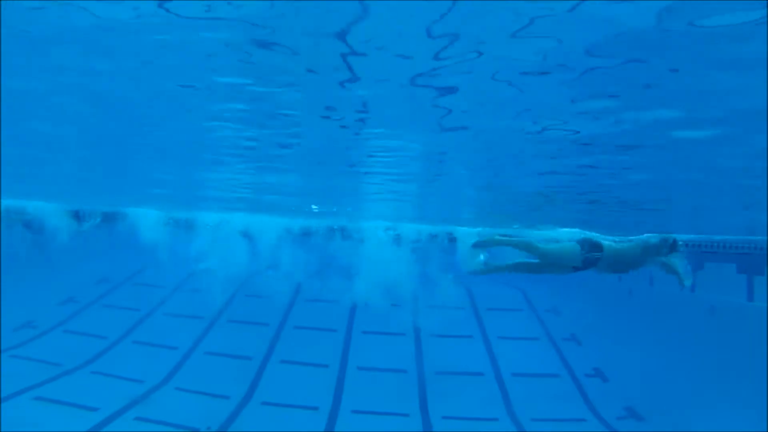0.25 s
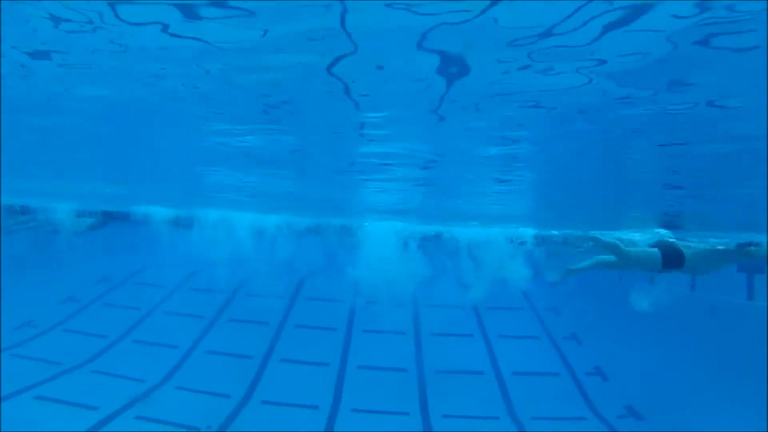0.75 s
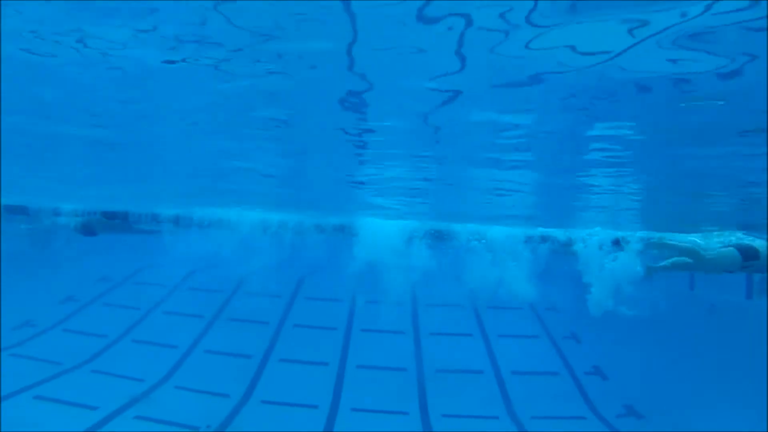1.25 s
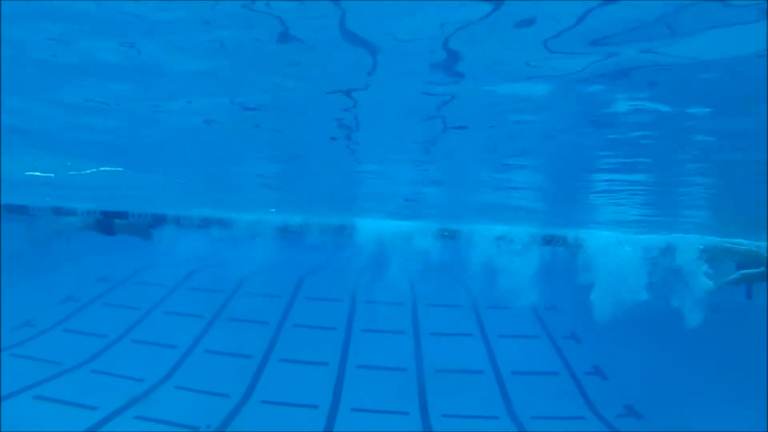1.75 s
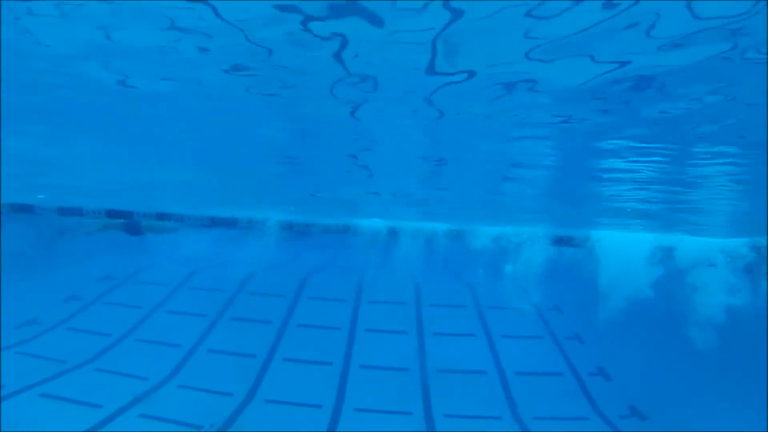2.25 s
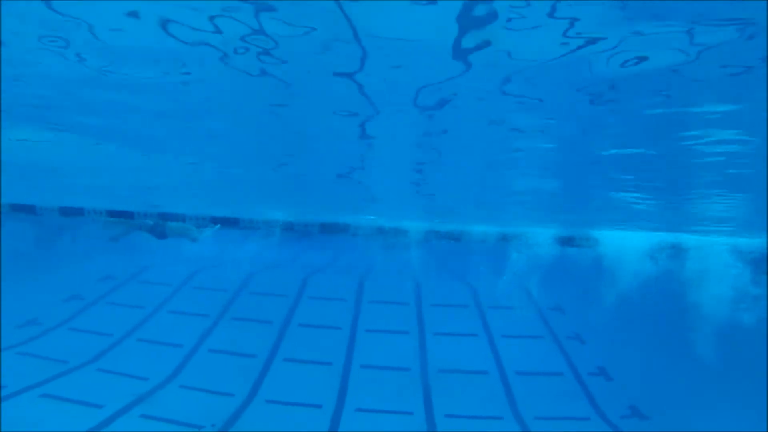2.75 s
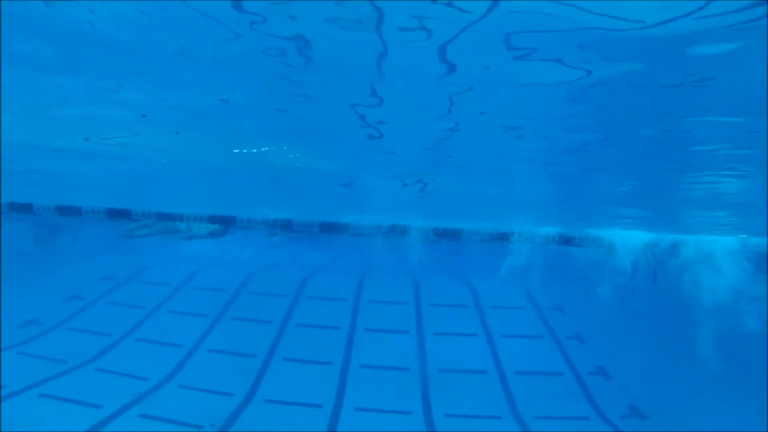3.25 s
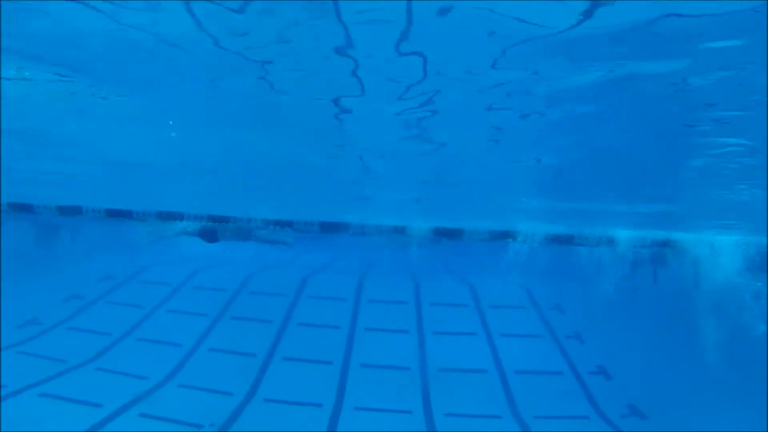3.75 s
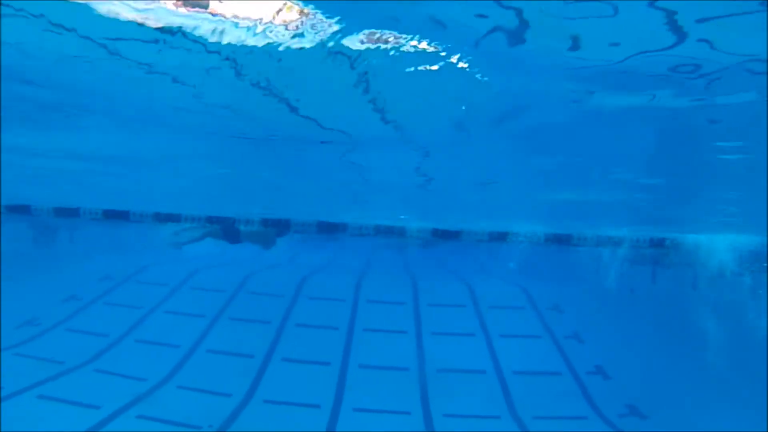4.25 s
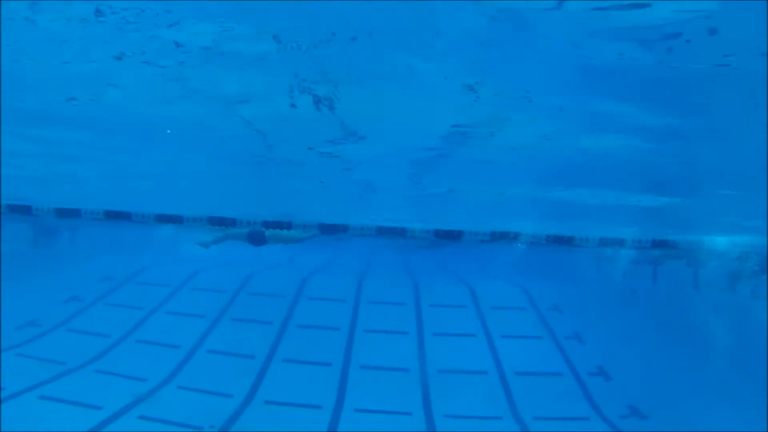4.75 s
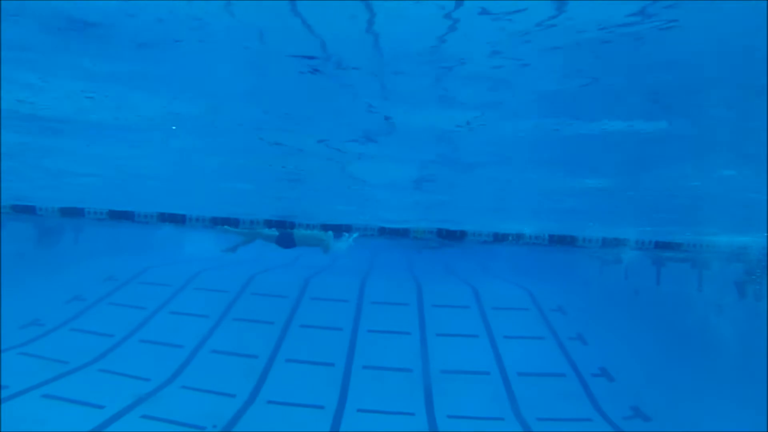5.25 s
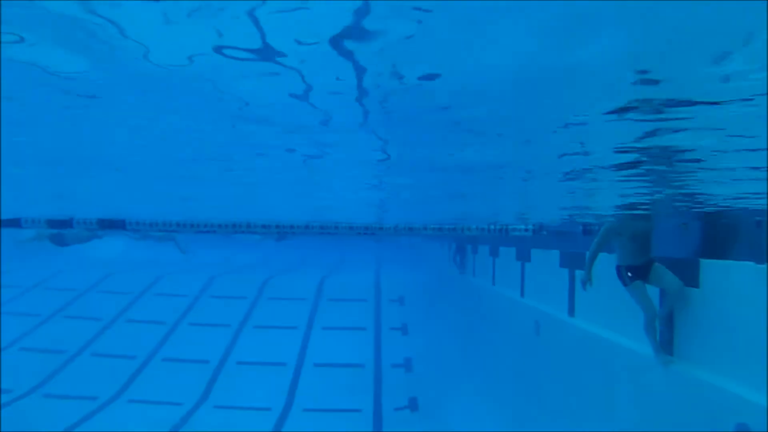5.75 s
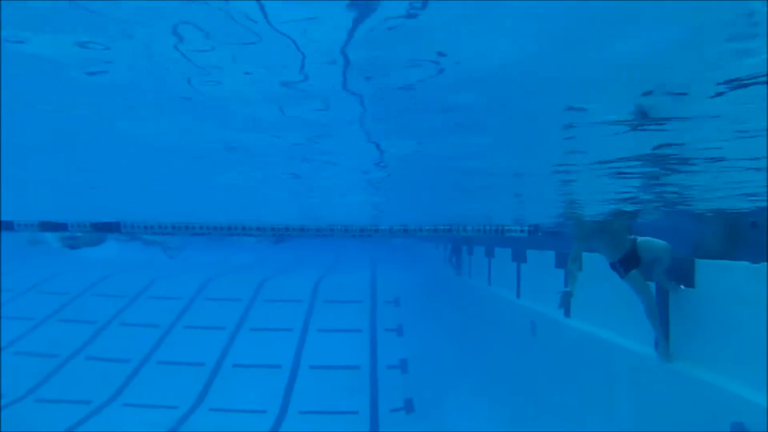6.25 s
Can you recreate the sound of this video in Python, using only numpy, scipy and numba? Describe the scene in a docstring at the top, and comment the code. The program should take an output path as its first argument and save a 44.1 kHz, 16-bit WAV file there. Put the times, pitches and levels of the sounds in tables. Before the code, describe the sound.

From the start, a low, muffled wash of churning water and bubbles is heard through a sealed microphone under the surface of a swimming pool. A swimmer's kicks swell it in uneven pulses, about four a second, over a hollow, resonant hum and gurgling foam. Single bubbles ring out throughout, some as deep plops, others as short, higher blips. Brighter clusters come at about 2 and 3 seconds, and the strongest low plops fall between 3.3 and 3.8 seconds. The bubbling carries on until about 5.6 seconds, when a tick marks an abrupt cut to calmer water by the pool wall. There the wash is quieter, with a low hum rising and falling, a few faint blips and a soft, deep plop just before the end at about 6.5 seconds. A faint microphone hiss lies under both places.

```python
"""A low churning wash dotted with plops, heard from a sealed microphone under water beside a pool's lanes.
A swimmer's kicks drive down clouds of large bubbles and his strokes leave foam; each bubble rings as a
fading sine, and pool and housing ring with them. Then a hard cut, with a tick, jumps to a calmer spot
by the wall. The microphone's own hiss lies under both places."""
import sys
import numpy as np
from scipy import signal
from scipy.fft import rfft, irfft, next_fast_len
from scipy.io import wavfile
from scipy.ndimage import uniform_filter1d
from numba import njit

SR = 44100
rng = np.random.default_rng(int(sys.argv[2]) if len(sys.argv) > 2 else 0)


def persist_wave(psi):
    """Save psi, clipped to +-1, as 16-bit WAV."""
    counts = np.round(np.clip(psi, -1, 1) * 32767).astype(np.int16)
    wavfile.write(sys.argv[1], SR, np.atleast_2d(counts).T)


N = 287091


def undb(db):
    """Gain of a level in dB."""
    return 10 ** (np.asarray(db) / 20)


def unit(x):
    """Scaled to rms 1."""
    return x / np.sqrt(np.mean(x ** 2))


def level_curves(table):
    """The columns of a timed level table, sample by sample."""
    times, *columns = np.transpose(table)
    return np.array([np.interp(np.arange(N) / SR, times, column) for column in columns])


@njit
def ring_bubbles(start, hz, cycles, size, glide, rise):
    """Each bubble's sine swells over `rise` periods; per `cycles` periods it fades to 1/e and glides up."""
    y = np.zeros(N)
    for k in range(len(start)):
        decay_samples = cycles[k] * SR / hz[k]
        phasor = size[k] + 0j
        step = np.exp(2j * np.pi * hz[k] / SR - 1 / decay_samples)
        bend = np.exp(2j * np.pi * glide * hz[k] / SR / decay_samples)
        closed, opening = 1., np.exp(-hz[k] / SR / rise)
        for i in range(int(start[k]), min(N, int(start[k] + 9 * decay_samples))):
            y[i] += phasor.imag * (1 - closed) ** 2
            closed *= opening
            phasor *= step
            step *= bend
    return y


def bubble_cloud(lo_hz, hi_hz, cycles, scatter_db, wash_db, count):
    """A swarm of bubbles of all sizes, a few far louder than the rest, over the blur of distant ones."""
    when, pitch, length, luck = rng.random((count, 4)).T
    hz = lo_hz * (hi_hz / lo_hz) ** pitch
    size = hz * undb(-scatter_db * np.log(1 - luck))  # rising with pitch keeps the spectrum flat
    swarm = ring_bubbles(when * N, hz, cycles * (.5 + length), size, glide=0.034, rise=0.28)
    distant = rng.standard_normal(N) * np.sqrt(SR / 2 / (hi_hz - lo_hz))
    return unit(swarm) + undb(wash_db) * distant


def through_water(x, slope, modes, lo_hz, hi_hz):
    """One soft-edged band of x, coloured by water and housing, at rms 1."""
    fft_n = next_fast_len(N, True)
    hz = np.fft.rfftfreq(fft_n, 1 / SR) + 1
    slope_hz, slope_db = np.transpose(slope)
    colour_db = np.interp(np.log(hz), np.log(slope_hz), slope_db)
    colour_db += sum(db / (1 + (2 * (hz - centre) / width) ** 2) for centre, width, db in modes)
    band = 1 / np.sqrt((1 + (lo_hz / hz) ** 16) * (1 + (hz / hi_hz) ** 16))
    return unit(irfft(rfft(x, fft_n) * undb(colour_db) * band, fft_n)[:N])


def microphone_at(clouds, levels, slope, modes, rumble_db, fizz_db, hiss_db):
    """The wash at one microphone position: seven bands, from rumble through the bubbles up to hiss."""
    # borders of the layers below, lowest first (frequency [Hz])
    edges_hz = [15, 90, 200, 460, 1400, 2200, 4500, 20000]
    churn, foam, fizz = clouds
    hum_db, churn_db, foam_db = levels
    noise = rng.standard_normal(N)
    flicker_db = 1.1 * unit(uniform_filter1d(rng.standard_normal(N), 1300))  # the treble flickers
    # low and high foam gurgle in patches, each at its own moments
    patches = [uniform_filter1d(rng.standard_normal(N), 1500) for _ in range(2)]
    gurgle_db = [0.72 * unit(uniform_filter1d(patch, 1500)) for patch in patches]
    swell_db = 0.93 * (foam_db - np.mean(foam_db))  # the finest bubbles come with the foam
    layers = [(noise, rumble_db),
              (churn, hum_db), (churn, churn_db),
              (foam, foam_db + gurgle_db[0]), (foam, foam_db + gurgle_db[1]),
              (fizz, fizz_db + swell_db + flicker_db),
              (noise, hiss_db + flicker_db)]
    return sum(undb(db) * through_water(source, slope, modes, lo_hz, hi_hz)
               for (source, db), lo_hz, hi_hz in zip(layers, edges_hz, edges_hz[1:]))


def beside_lanes(clouds):
    """Microphone beside the lanes: a steady wash of bubbles, stirred by the swimmer."""
    # the wash between kicks (time [s], hum [dB], churn [dB], foam [dB])
    wash = [(0, -42, -42, -51), (1.75, -43.5, -42.5, -52), (2.4, -40.5, -40.5, -49.5),
            (3.0, -42.5, -40.5, -51.5), (4.0, -40, -39.5, -49.5), (5.6, -41, -42, -48.5)]
    # broad response of water and housing here (frequency [Hz], relative gain [dB])
    slope = [(20, -28.5), (45, -25), (85, -17), (160, -10), (400, -4.5), (470, -20.5), (800, -10),
             (1300, -22.5), (1800, -38.5), (2200, -50.5), (4000, -64), (7000, -72.5), (11500, -83.5),
             (16000, -90)]
    # their resonances and dips (frequency [Hz], width [Hz], gain [dB])
    modes = [(122.6, 46, 14), (145, 1, -1.5), (160.2, 26, 15), (230.6, 11, 7), (265.3, 12, 6.5),
             (372.7, 22, 2.5), (520, 79, 13.5), (568, 8.5, 4), (627.3, 118, 13.5), (775, 40, -11),
             (845, 13, 5.5), (925, 38.5, -8.5), (983.4, 28, 8), (1095, 120, 6), (1425, 190, -10.5),
             (1700, 110, 3), (2070, 12, 6.5), (2720, 150, -5.5), (2927, 53, 11), (3170, 240, 6.5),
             (3370, 150, -4.5), (3710, 210, 3), (5160, 520, 6.5)]
    levels = add_kicks(level_curves(wash))
    return microphone_at(clouds, levels, slope, modes, rumble_db=-51.5, fizz_db=-66, hiss_db=-85)


def plops():
    """Single bubbles that ring out clear of the wash, in both places."""
    # one bubble a row (time [s], size [dB], pitch [Hz], fade to 1/e [periods])
    bubbles = [(.070, -37, 621, 13), (.130, -44, 1595, 18), (0.159, -23.5, 159.7, 4.5),
               (0.186, -22, 156.3, 4.3), (.298, -21, 160, 3.6), (0.36, -32.5, 1280, 8.6),
               (0.363, -39, 1620, 7.7), (.372, -35.5, 1056, 11), (.467, -39, 1110, 5),
               (.205, -25.5, 156, 3.2), (.618, -34.5, 1045, 10), (0.697, -28, 144, 2.6),
               (.651, -36.5, 1210, 8.3), (0.686, -42, 1160, 8), (0.717, -41, 1700, 8.2),
               (0.627, -26.5, 339, 3.1), (0.675, -32, 326, 3.4), (0.741, -39, 1714, 18),
               (.889, -37, 1020, 9), (.900, -22, 153, 7.1), (.997, -37.5, 1056, 19), (1.068, -49, 2050, 22),
               (1.118, -29, 291, 3), (.255, -26.5, 280, 3.9), (.599, -39, 1280, 8), (.773, -41, 1750, 10),
               (.814, -38, 1720, 10), (1.151, -16.5, 158, 3), (1.165, -40, 1090, 8.9),
               (1.246, -22, 148, 2.2), (1.277, -38, 1503, 11), (1.336, -24.5, 161, 6.1),
               (1.417, -68, 7400, 12), (1.417, -68, 5500, 9.7), (1.417, -54, 3050, 5.4),
               (1.428, -54, 2950, 8.6), (1.420, -29.5, 372, 4.9), (1.4583, -32, 1770, 6.5),
               (1.489, -39.5, 1610, 10), (1.524, -31, 340, 4.7), (1.550, -40, 1640, 17),
               (1.636, -43, 1800, 14), (1.737, -26.5, 165, 4.8), (1.829, -39, 1080, 12),
               (1.865, -38, 1130, 18), (1.892, -37.5, 1180, 14), (1.914, -36.5, 1220, 10),
               (1.956, -40, 1170, 8), (2.049, -36.5, 1710, 7), (2.128, -29.5, 363, 4),
               (2.395, -39, 1166, 13), (2.752, -28.5, 224, 2.9), (2.943, -27, 256, 2.7),
               (1.928, -26.5, 151, 3.7), (1.992, -25.5, 1363, 9.2), (2.160, -35, 1264, 18),
               (2.185, -20, 407.4, 6.9), (2.243, -21.5, 153.5, 3.4), (2.001, -22, 157, 3.2),
               (2.193, -27, 151, 4.8), (2.325, -27, 151, 4.1), (2.396, -25.5, 164, 3.5),
               (2.429, -22.5, 154, 2.2), (2.612, -29, 220, 3.5), (2.648, -28, 153.4, 6),
               (2.491, -29, 163, 2.5), (2.915, -56, 3650, 9.7), (2.908, -40, 1620, 10),
               (2.921, -36.5, 1595, 14), (2.942, -41, 1583, 25), (2.952, -21, 1050, 5),
               (2.964, -31, 990, 9.6), (2.954, -36, 1234, 6.3), (2.960, -51.5, 3500, 10),
               (2.998, -32, 1280, 6.5), (3.004, -30, 1050, 5.3), (3.018, -33, 1100, 5),
               (3.084, -37, 1125, 14), (3.082, -39.5, 1520, 6), (3.037, -44, 1750, 8.3),
               (3.044, -36.5, 990, 19), (3.063, -36, 1146, 11), (3.104, -23.5, 171, 2.4),
               (3.217, -35, 1160, 14), (3.238, -38, 1420, 8.6), (3.256, -22, 155.4, 3),
               (3.273, -21.5, 151.3, 3.2), (3.459, -37, 1080, 4.9), (3.347, -24, 199, 1.6),
               (3.364, -20, 262, 1.3), (3.371, -18, 250, 0.92), (3.322, -18, 166, 2), (3.351, -36, 1150, 4),
               (3.352, -36, 2120, 7.9), (3.352, -31.5, 1680, 7.8), (3.357, -43, 2250, 10),
               (3.352, -37, 2370, 4.5), (3.352, -49, 2870, 4.6), (3.379, -35.5, 1660, 14),
               (3.409, -39, 1700, 15), (3.521, -30.5, 598, 4.9), (3.659, -47, 2090, 29),
               (3.665, -15, 239, 3.9), (3.674, -18.5, 165, 5.4), (3.715, -20, 164.2, 6),
               (3.838, -24.5, 230, 2.6), (3.741, -26, 347, 4.2), (3.687, -15, 237, 2.8),
               (3.690, -50, 4140, 2.4), (3.690, -59, 7040, 2.3), (3.705, -52.5, 3000, 9.9),
               (3.757, -15, 202, 2.2), (3.791, -21.5, 210, 2.7), (3.871, -24.5, 162, 10.4),
               (3.908, -35, 154, 5), (4.240, -32, 394, 6.6), (4.292, -26.5, 164.6, 5.2),
               (4.358, -27, 379, 4), (4.407, -36, 972, 8), (4.587, -37, 980, 8), (4.665, -36, 1024, 13),
               (4.982, -34.5, 1010, 8), (4.326, -44, 1250, 8.9), (4.440, -36.5, 1580, 9.9),
               (4.445, -32, 1253, 15), (4.494, -36, 1237, 8.2), (4.635, -37.5, 1136, 16),
               (4.681, -35, 360, 2.1), (4.828, -41, 1755, 12), (4.838, -31, 1060, 9),
               (4.926, -39, 1130, 15), (5.026, -42.5, 1776, 17), (5.042, -29.5, 149, 4.3),
               (5.072, -36, 986, 12), (5.177, -35.5, 1014, 7.1), (5.197, -33, 985, 8.8),
               (5.295, -37, 980, 8), (5.384, -36, 1134, 9.6), (5.336, -47, 3140, 9),
               (5.33, -48.5, 2945, 18), (5.339, -49, 2950, 23), (5.404, -55, 2950, 14),
               (5.352, -30.5, 392, 18), (5.453, -30.5, 1065, 6.5), (5.470, -36.5, 1026, 10),
               (5.298, -42, 1990, 8), (5.541, -28, 1575, 7.3), (5.560, -40, 1694, 13),
               (5.579, -36, 1130, 7.3), (5.605, -41, 1760, 10), (5.851, -40, 1080, 7.1),
               (6.102, -45, 2350, 8), (6.102, -54, 2700, 5), (6.102, -52, 2050, 5), (6.160, -54, 1750, 8),
               (6.210, -52, 2350, 10), (6.406, -52, 2800, 11), (6.462, -29, 72, 1.05)]
    times, size_db, hz, cycles = np.transpose(bubbles)
    return ring_bubbles(times * SR, hz, cycles, undb(size_db), glide=.005, rise=0.86)


def add_kicks(wash_db):
    """Each kick drives a cloud down: the levels of hum, churn and foam swell over the wash and die away."""
    # each kick at its loudest (time [s], hum [dB], churn [dB], foam [dB])
    kicks = [(.19, -41.5, -43.5, -51.5), (0.371, -45.5, -48.5, -54), (0.701, -37.5, -41, -48.5),
             (0.929, -40.5, -42, -53), (1.189, -37, -41, -53.5), (1.35, -49, -46, -56.5),
             (1.439, -49.5, -42, -56), (1.55, -41.5, -43, -52), (1.76, -44.5, -45, -55),
             (1.959, -36.5, -42, -49.5), (2.19, -44.5, -38, -49.5), (2.421, -43.5, -43, -56),
             (2.628, -41.5, -54, -49), (2.95, -53.5, -35.5, -48), (3.329, -37.5, -38, -48),
             (3.46, -35.5, -50, -52.5), (3.688, -31.5, -37, -51.5), (3.90, -44, -45, -52),
             (4.299, -40.5, -43, -52.5), (4.47, -37.5, -43, -49), (4.681, -44, -36.5, -48),
             (4.849, -41.5, -43, -52), (5.109, -46, -39, -50.5), (5.37, -39.5, -56, -55)]
    rise_s, fade_s, hop = 0.04, 0.057, 64
    peak_s, *peak_db = np.transpose(kicks)
    since = np.arange(0, N, hop) / SR - peak_s[:, None]
    swell = np.where(since < 0, np.exp(-(since / rise_s) ** 2), np.exp(-np.abs(since) / fade_s))
    stepped_power = np.repeat(undb(peak_db) ** 2 @ swell, hop, axis=1)[:, :N]
    kick_power = uniform_filter1d(stepped_power, 256)
    return 10 * np.log10(undb(wash_db) ** 2 + kick_power)


def hard_cut(first, second, at_s):
    """From one microphone position to the next: the waveform jumps and ticks."""
    since = np.arange(N) / SR - at_s
    share = (1 + np.tanh(since / .0006)) / 2
    tick = undb(-34) * (since > 0) * np.exp(-np.abs(since) / .002)
    return (1 - share) * first + share * second + tick


def by_wall(clouds):
    """Microphone by the wall: calmer water, where the low hum of the bubble clouds rises and falls."""
    # the quieter wash (time [s], hum [dB], churn [dB], foam [dB])
    wash = [(5.65, -46.5, -56, -60), (5.82, -50, -55.5, -61), (5.99, -45.5, -56.5, -59),
            (6.16, -52, -56, -58), (6.33, -51, -54, -60.5), (6.5, -46.5, -58, -62)]
    # broad response of water and housing here (frequency [Hz], relative gain [dB])
    slope = [(20, -11), (50, -17), (100, -10.5), (160, -13), (300, -27), (500, -16.5), (900, -21),
             (1400, -43), (2200, -45.5), (4000, -44.5), (7000, -60), (11500, -68.5), (16000, -73)]
    # their resonances and dips (frequency [Hz], width [Hz], gain [dB])
    modes = [(136, 40, 7.5), (360, 110, 4.5), (460, 124, -19.5), (540, 33, 7.5), (1111, 215, 19.5),
             (1740, 110, 5.5), (2020, 41, 6.5), (2394, 100, 10.5), (2890, 240, 8), (3780, 140, 6)]
    levels = level_curves(wash)
    return microphone_at(clouds, levels, slope, modes, rumble_db=-59, fizz_db=-73.5, hiss_db=-84.5)


def scene():
    """Large, middling and fine bubbles in mono, first beside the lanes, then by the wall."""
    churn = bubble_cloud(74.2, 557, cycles=2.66, scatter_db=2.1, wash_db=3.0, count=2500)
    foam = bubble_cloud(377.2, 2612, cycles=7, scatter_db=1.3, wash_db=1.2, count=6000)
    fizz = bubble_cloud(1900, 5200, cycles=23.0, scatter_db=0.48, wash_db=0.44, count=2500)
    clouds = churn, foam, fizz
    wash = hard_cut(beside_lanes(clouds), by_wall(clouds), at_s=5.6391)
    return (wash + plops())[None]


def record(dry):
    """The recorder cuts the top with a steep low-pass."""
    top_hz = 15800
    return signal.sosfilt(signal.ellip(8, .2, 70, top_hz, fs=SR, output="sos"), dry)


dry = scene()
out = record(dry)
persist_wave(out)
```